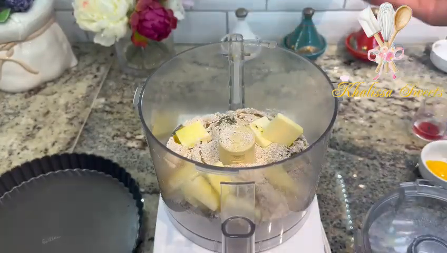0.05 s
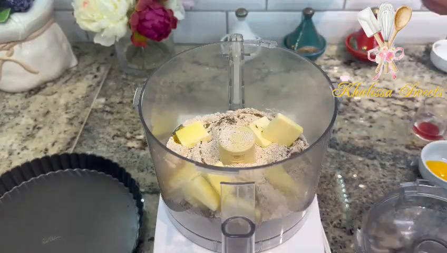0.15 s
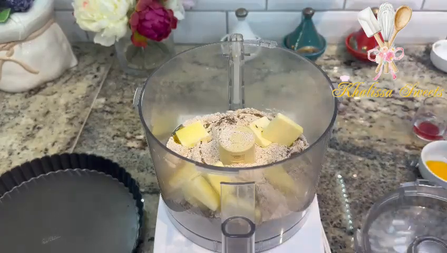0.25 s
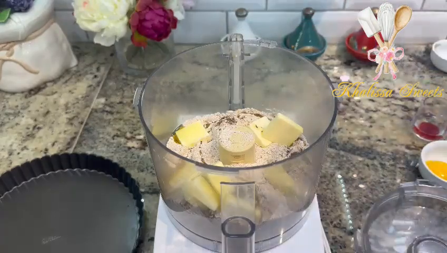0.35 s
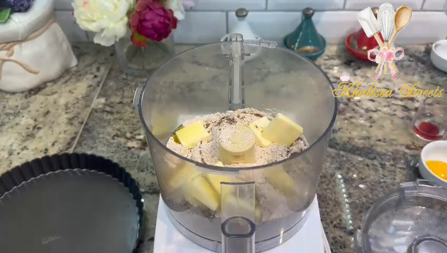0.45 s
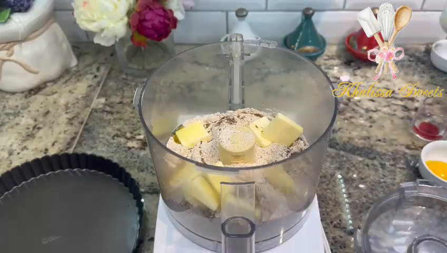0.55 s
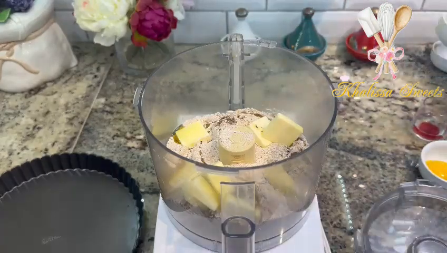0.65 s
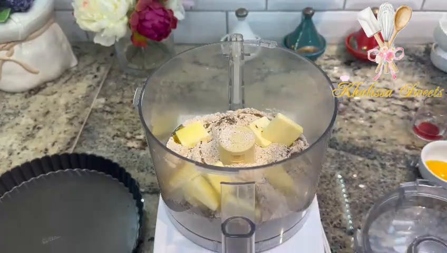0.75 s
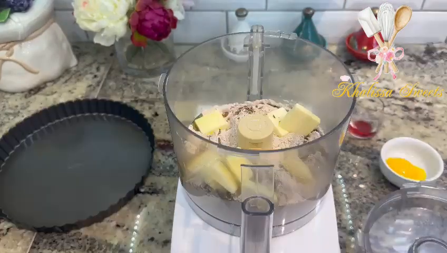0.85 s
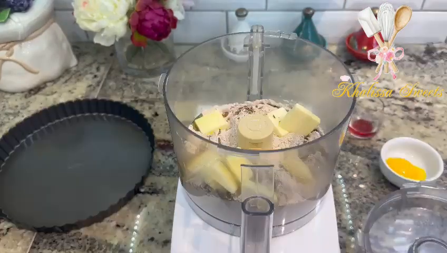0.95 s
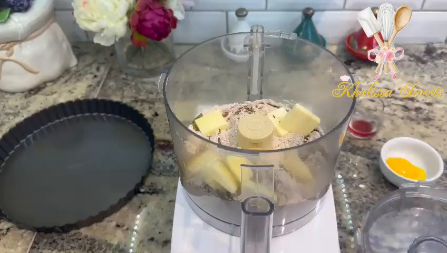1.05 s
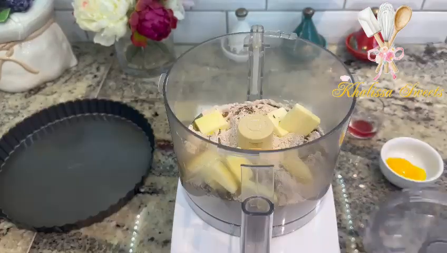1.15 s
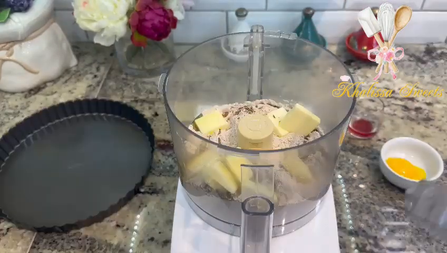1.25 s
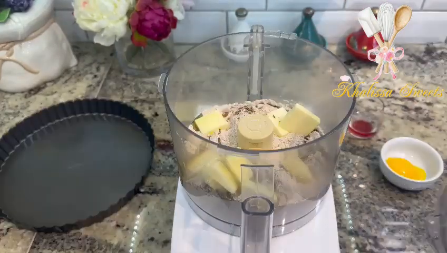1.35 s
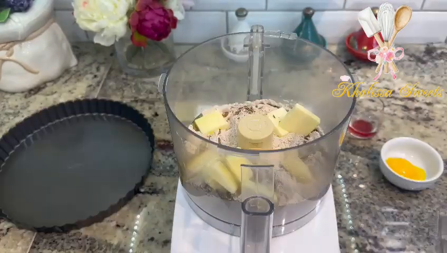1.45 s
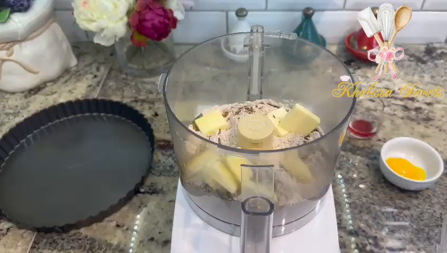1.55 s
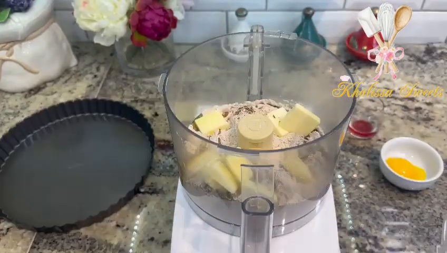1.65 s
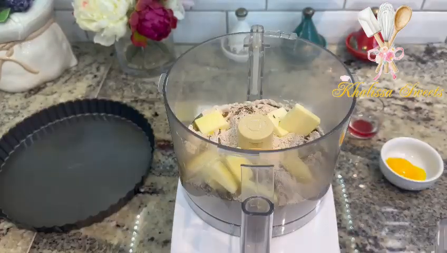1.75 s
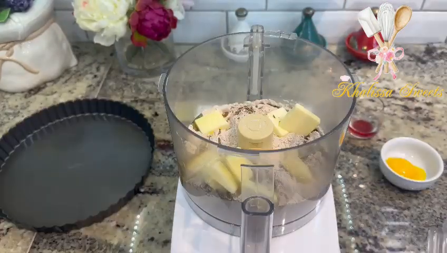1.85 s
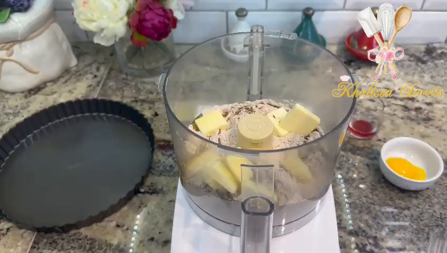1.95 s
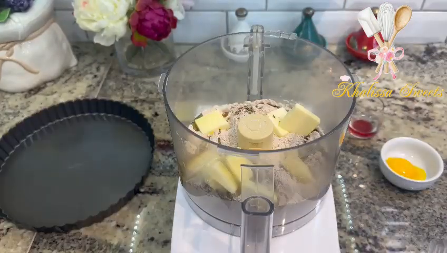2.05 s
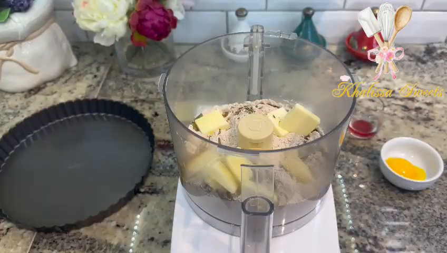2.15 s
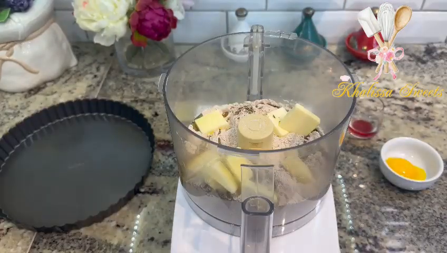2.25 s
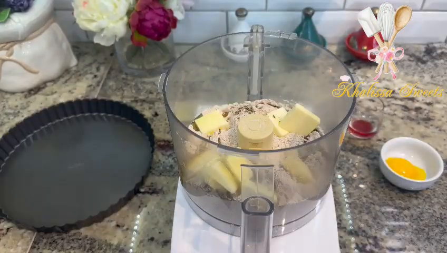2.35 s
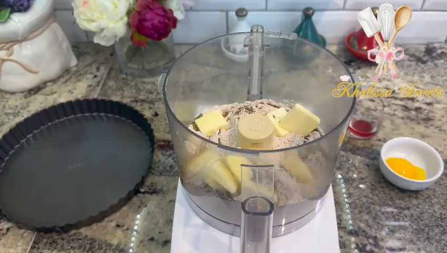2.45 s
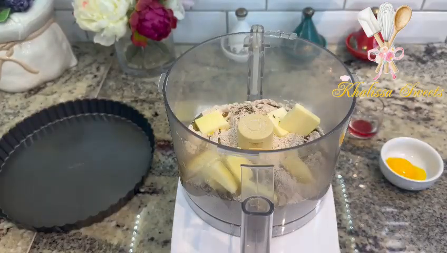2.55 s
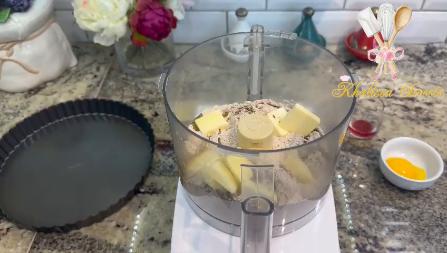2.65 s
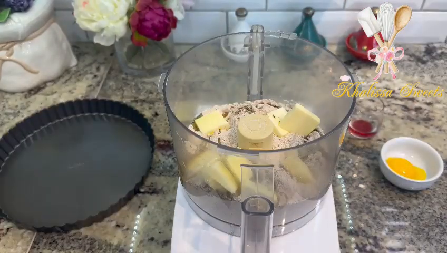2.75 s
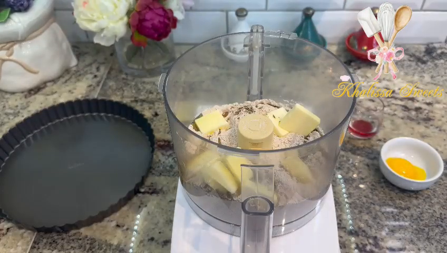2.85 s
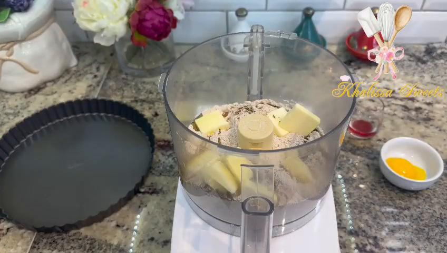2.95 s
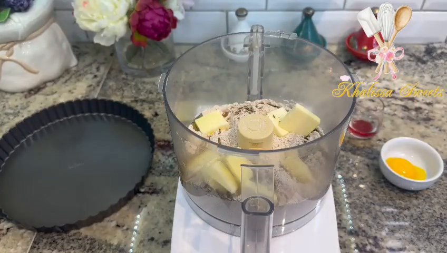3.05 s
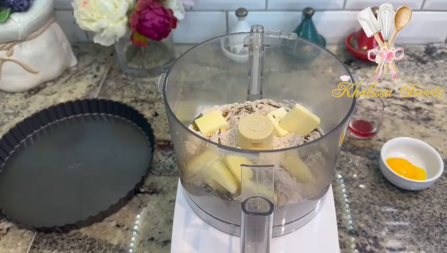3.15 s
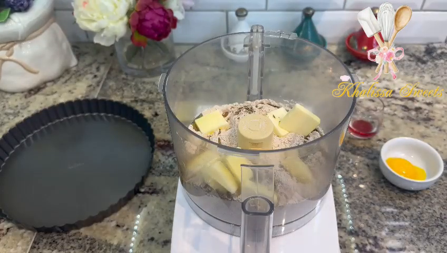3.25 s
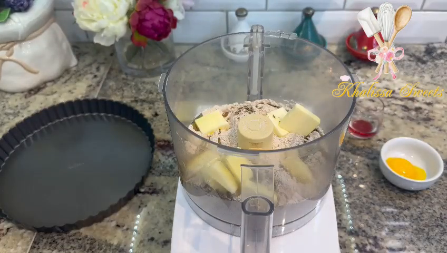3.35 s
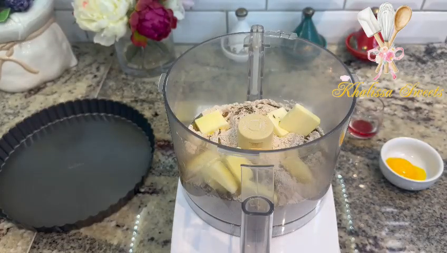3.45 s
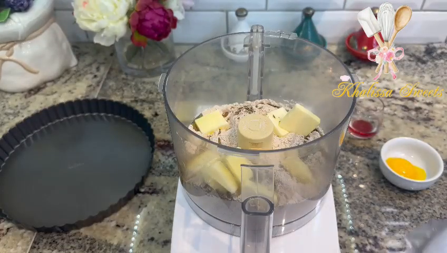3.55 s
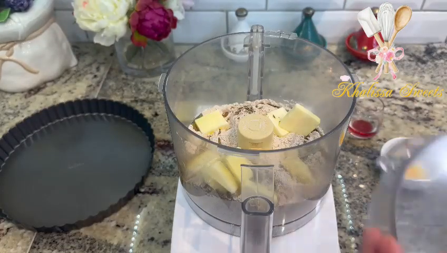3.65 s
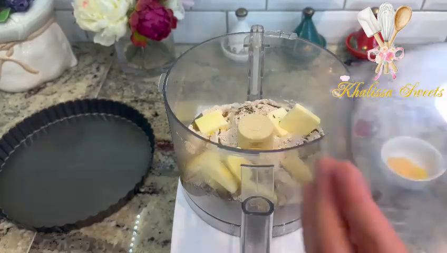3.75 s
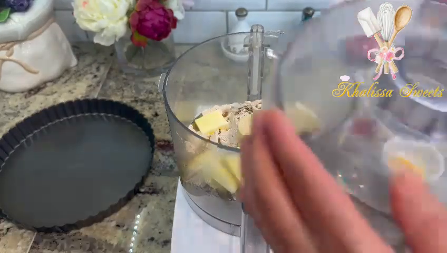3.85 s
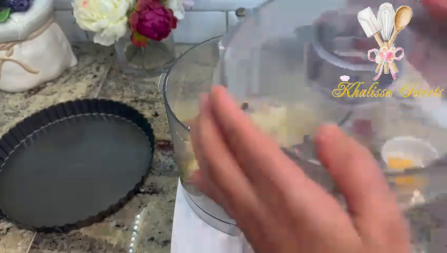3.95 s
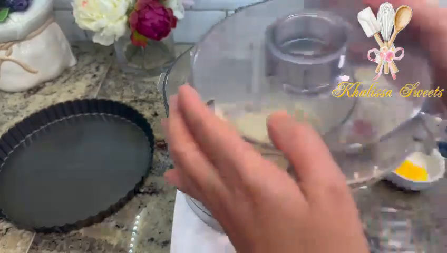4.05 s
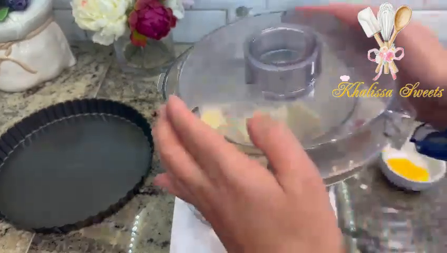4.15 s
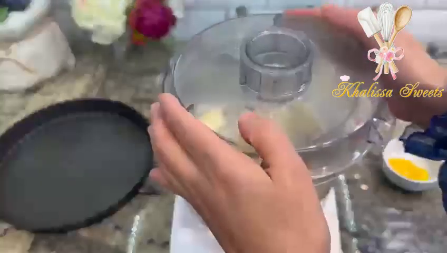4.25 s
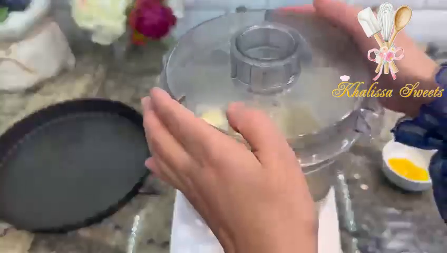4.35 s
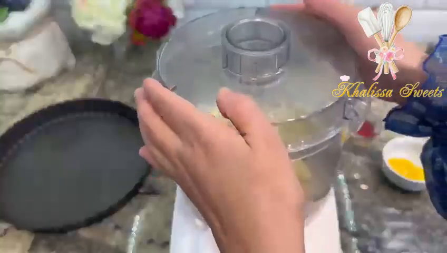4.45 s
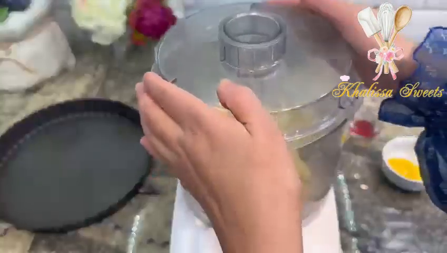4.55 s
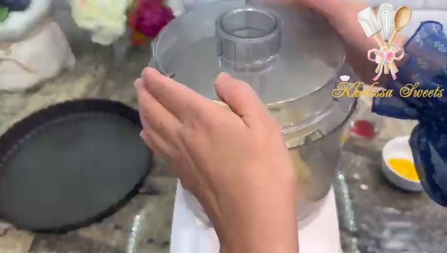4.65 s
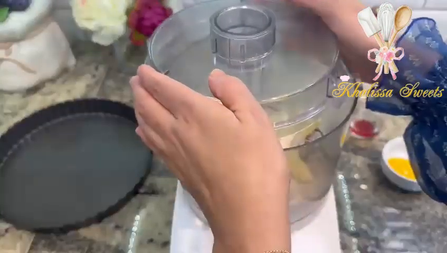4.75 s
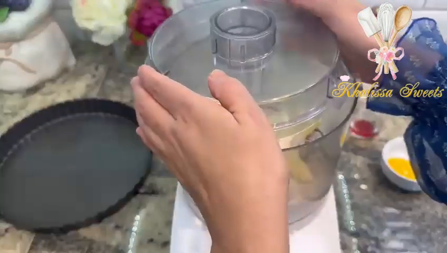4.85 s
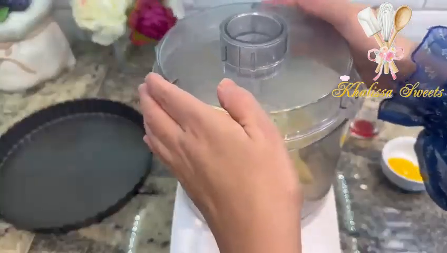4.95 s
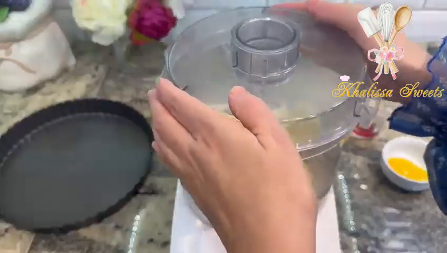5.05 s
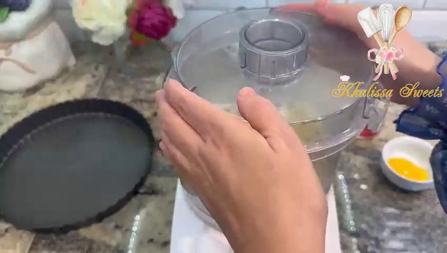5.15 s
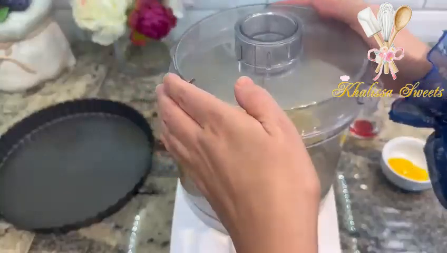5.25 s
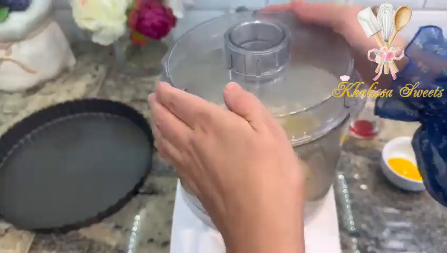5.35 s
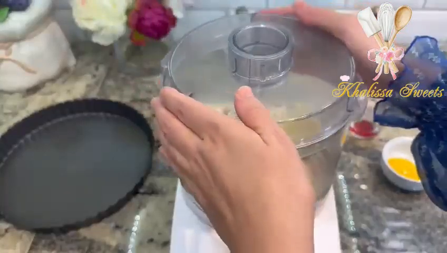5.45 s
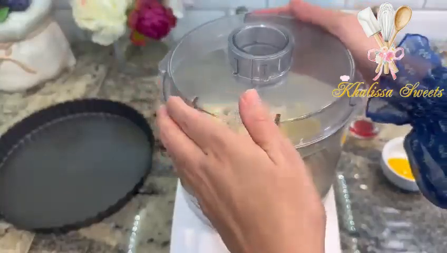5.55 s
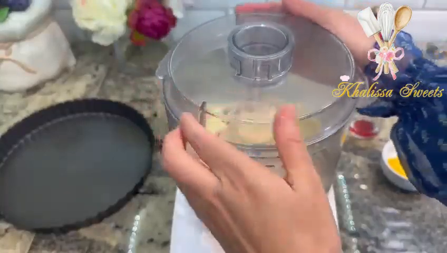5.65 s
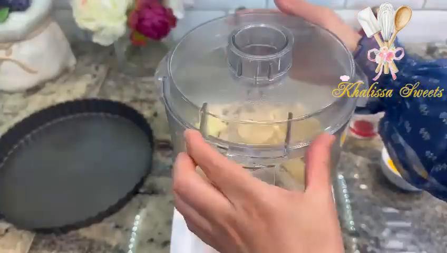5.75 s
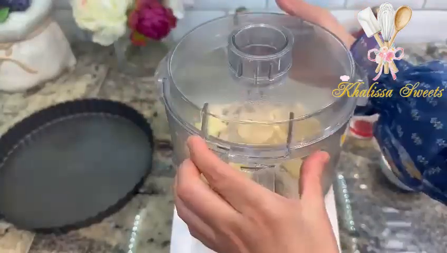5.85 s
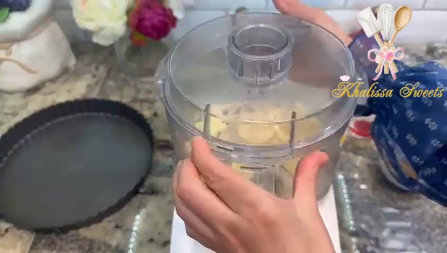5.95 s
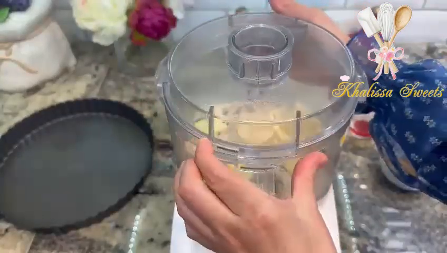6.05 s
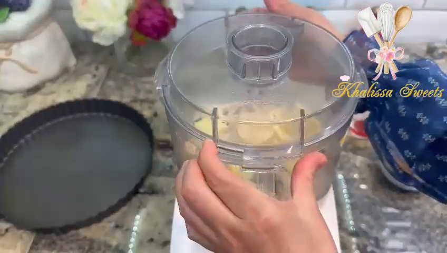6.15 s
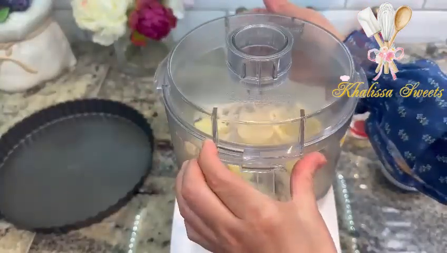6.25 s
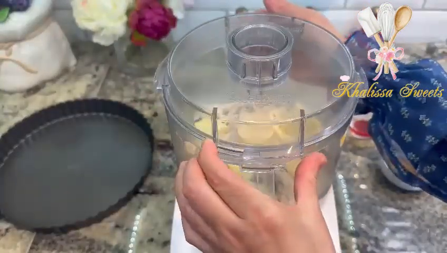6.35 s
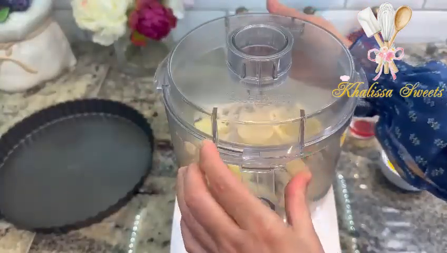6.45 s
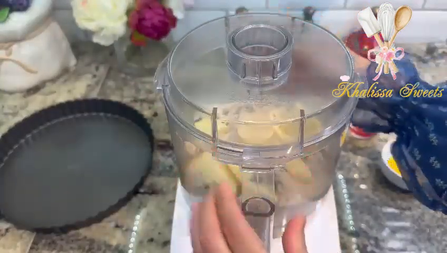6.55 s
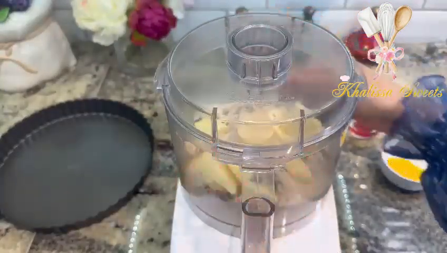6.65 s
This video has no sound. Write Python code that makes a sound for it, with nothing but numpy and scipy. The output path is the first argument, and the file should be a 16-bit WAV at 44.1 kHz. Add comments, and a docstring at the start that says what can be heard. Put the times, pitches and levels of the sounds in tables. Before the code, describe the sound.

In a small kitchen with a low hum, a plastic lid is picked up with a short ringing clatter, followed by soft cloth swishes and scattered taps. Close in front, it clacks onto a food processor bowl and slides along the rim, rasping and knocking hollowly. A quick cluster of clacks with a tiny squeak seats it, and a firm snap locks it. Each knock has a short room echo.

```python
"""Fitting a food processor lid.

A plastic lid is lifted off a counter, set on the bowl, slid round the rim and snapped shut.
Each knock rings the plastic and the air under the lid, whose hollow note falls as the gap closes.
A sleeve rustles in between; the small hard kitchen hums faintly and throws the knocks back."""
import sys
import numpy as np
from scipy import signal
from scipy.fft import rfft, irfft
from scipy.io import wavfile
from scipy.ndimage import uniform_filter1d

SR = 44100
rng = np.random.default_rng(int(sys.argv[2]) if len(sys.argv) > 2 else 0)


def store_wav(level_fs):
    """Save 16-bit WAV to argv[1]."""
    pcm = np.round(np.clip(np.atleast_2d(level_fs), -1, 1) * 32767)
    wavfile.write(sys.argv[1], SR, pcm.T.astype(np.int16))


N = 295955

# sleeve cloth spectrum: freq_hz, density_db
CLOTH_SPECTRUM = [(290, -14.5), (500, -4), (712, -6.5), (902, -5.5), (1300, -2), (1980, -3.5), (2290, -0.5),
                  (2930, -9.5), (4120, -4.5), (6700, -15), (9050, -8.5), (9920, -17), (11500, -44)]
# ring of lid and bowl, with the air under the lid at 524 Hz: freq_hz, level_db, t60_s
SHELL_MODES = [(524, -3, .1), (830, -8, .07), (1029, -5, .17), (1170, -6, .1), (1290, -4, .09),
               (1375, -1, .14), (1490, -2, .11), (1560, -4, .1), (1680, 0, .14), (1810, -8, .07),
               (2036, -8, .1), (2170, -10, .08), (2600, -16, .08), (2713, -17, .11)]
# air under the lid, lower as the gap narrows, higher once seated: time_s, pitch_hz
AIR_PITCH = [(4.24, 562), (4.32, 459), (4.45, 433), (4.52, 407), (4.59, 328), (4.78, 399), (4.97, 369),
             (5.01, 335), (5.2, 404), (5.335, 335), (5.47, 324), (5.7, 299), (6.15, 427)]


def amp(db):
    """Decibels to gain."""
    return 10 ** (np.asarray(db) / 20)


def unit(x):
    """Scale to rms 1."""
    return x / np.sqrt(np.mean(x ** 2) + 1e-20)


def struck(x):
    """Scale a blow to the energy of 20 ms at rms 1."""
    return unit(x) * np.sqrt(0.02 * SR / x.shape[-1])


def read(points, hz):
    """Interpolate on a log-frequency axis."""
    freq_hz, value = np.transpose(points)
    return np.interp(np.log(hz + 1), np.log(freq_hz + 1), value)


def add(mix, start_s, sound):
    """Mix in a stereo sound."""
    part = mix[:, round(start_s * SR):][:, :sound.shape[1]]
    part += sound[:, :part.shape[1]]


def colour(x, gain_db, size=2048):
    """Causal filter with response gain_db(hz)."""
    log_gain = np.log(amp(gain_db(abs(np.fft.fftfreq(size, 1 / SR)))))
    taps = np.fft.ifft(np.exp(np.conj(signal.hilbert(log_gain)))).real
    return signal.fftconvolve(x, taps[None, :size // 2], axes=1)[:, :x.shape[1]]


def bell(hz, centre_hz, width_oct):
    """Bell curve of height 1 over log frequency."""
    return np.exp(-(np.log2((hz + 1) / centre_hz) / width_oct) ** 2)


def paired(x):
    """Make two unrelated channels alike in the bass, as at two close points."""
    # left-right likeness: freq_hz, correlation
    likeness = [(60, 0.82), (200, 0.56), (400, 0.24), (700, 0), (1200, 0.09), (5000, 0.07)]
    left, other = rfft(x)
    same = read(likeness, np.fft.rfftfreq(x.shape[1], 1 / SR))
    return irfft([left, same * left + np.sqrt(1 - same ** 2) * other], x.shape[1])


def noise(spectrum):
    """Coloured stereo noise, rms 1."""
    white = paired(rng.standard_normal((2, N)))
    return unit(colour(white, lambda f: read(spectrum, f), size=8192))


def waver(rate_hz):
    """Random curve, rms 1."""
    knots = rng.standard_normal(4096)
    return unit(np.interp(np.arange(N) / SR * rate_hz, np.arange(len(knots)), knots))


def patchy(x, depth_db, span_hz, span_s):
    """The contact wanders, so parts of the spectrum come and go."""
    bands = signal.stft(x, SR, nperseg=512)[2]
    field = rng.standard_normal(bands.shape[1:])
    for axis, width in enumerate([span_hz * 512 / SR, span_s * SR / 256]):
        for _ in range(2):
            field = uniform_filter1d(field, max(1, round(width)), axis)
    return unit(signal.istft(bands * amp(depth_db * unit(field)), SR, nperseg=512)[1][:, :N])


def stroke(start_s, length_s, level_db, rise_s, release_db_per_s, sag_db_per_s=0):
    """Gain of one movement: attack, hold with optional sag, release."""
    t = np.maximum(np.arange(N) / SR - start_s, 0)
    fall_db = sag_db_per_s * t + release_db_per_s * np.maximum(t - length_s, 0)
    return np.minimum(t / rise_s, 1) * amp(level_db - fall_db)


def ring(modes, t, spread_db, detune=0.0043):
    """Dying modes, bent by the grip; each contact and channel gets its own mix."""
    hz, db, t60_s = np.transpose(modes)[:, :, None]
    hz = hz * (1 + detune * rng.standard_normal(hz.shape))
    weight_db = spread_db * rng.standard_normal((2, len(hz), 1))
    phase = 2 * np.pi * rng.random((2, len(hz), 1))
    return (amp(db + weight_db - 60 * t / t60_s) * np.sin(2 * np.pi * hz * t + phase)).sum(1)


def damped_sines(modes, t):
    """Mono modes starting in phase."""
    return sum(amp(db - 60 * t / t60_s) * np.sin(2 * np.pi * hz * t) for hz, db, t60_s in modes)


def resonate(x, pitch_hz, width_hz):
    """Two resonators in series, following a pitch curve."""
    turn = np.exp(2j * np.pi * np.cumsum(pitch_hz) / SR)
    pole = np.exp(-np.pi * width_hz / SR)
    for _ in range(2):
        x = 2 * (turn * signal.lfilter([1 - pole], [1, -pole], x / turn + 1e-18)).real
    return x


def crack(t, t60_s, gain_db, grit_db=0):
    """Dense, heavily damped plastic modes, gritty where edges chatter."""
    grit = amp(grit_db * waver(rate_hz=800)[:len(t)])
    white = paired(rng.standard_normal((2, len(t))))
    return struck(colour(white * grit * amp(-60 * t / t60_s), gain_db))


def puff(t, hz, swell_cycles):
    """A few cycles that swell and die."""
    age = t * hz / swell_cycles
    return struck(age ** 2 * np.exp(-2 * age) * np.sin(2 * np.pi * hz * t))


def room_tone(air_db=-62.5):
    """Low air noise and a wavering drone."""
    # room air: freq_hz, density_db
    air_spectrum = [(12, -50.5), (20, 0.5), (53, -3.5), (119, -15), (147, -23), (182, -12), (334, -18.5),
                    (436, -17.5), (498, -27.5), (616, -27), (850, -35.5), (1250, -30.5), (1450, -27.5),
                    (1900, -39.5), (3000, -42), (4640, -41.5), (7000, -49.5), (9500, -47), (11500, -59)]
    # kitchen drone: pitch_hz, level_db
    hum_partials = [(62, -74.5), (189, -84)]
    hum, t = 0, np.arange(N) / SR
    for hz, db in hum_partials:
        gain = amp(db + 7.7 * waver(rate_hz=8.6))
        hum += gain * unit(np.sin(2 * np.pi * hz * t + 0.2 * waver(rate_hz=43)))
    swell = amp(air_db + 0.8 * waver(rate_hz=4))
    return swell * noise(air_spectrum) + hum


def fibres(snags_per_s=420, size_db=-2):
    """Single threads snag and let go."""
    snags = (rng.random(N) < snags_per_s / SR) * amp(size_db * np.minimum(rng.exponential(1, N), 3))
    clicks = snags * rng.standard_normal((2, N))
    return unit(colour(clicks, lambda f: read(CLOTH_SPECTRUM, f) + 2 * np.log2((f + 1) / 4000)))


def sleeve(arm_in_s=1.0, stir_db=-78.5, fold_db=3.5, grain_db=-0.56):
    """Rubbing cloth: a faint, uneven hiss, with swishes coloured by their folds."""
    # arm movements: start_s, length_s, level_db, fold_hz
    brushes = [(1.02, .12, -67, 7950), (1.29, 0.1, -67.5, 2780), (1.55, 0.043, -66, 8250),
               (1.608, 0.12, -70, 4600), (1.748, 0.073, -71, 4400), (1.934, 0.26, -69, 1920),
               (2.076, 0.19, -67, 5400), (2.232, 0.13, -66, 3820), (2.358, 0.1, -60.5, 3800),
               (2.543, 0.083, -59.5, 7660), (2.631, .11, -59.5, 4300), (3.498, 0.097, -65, 2200),
               (3.565, 0.098, -62, 3800), (5.573, 0.27, -71, 8660), (6.463, 0.12, -69, 5300)]
    shape = dict(rise_s=0.032, release_db_per_s=263)
    cloth = patchy(noise(CLOTH_SPECTRUM) + amp(-4) * fibres(), depth_db=3.2, span_hz=300, span_s=0.05)
    out = cloth * stroke(arm_in_s, N / SR, stir_db, **shape) * amp(2.5 * waver(rate_hz=14))
    for start_s, length_s, level_db, fold_hz in brushes:
        swish = unit(colour(cloth, lambda f: fold_db * bell(f, fold_hz, width_oct=0.24), size=512))
        out += stroke(start_s, length_s, level_db, **shape) * np.roll(swish, rng.integers(N), axis=1)
    return amp(grain_db * waver(rate_hz=280)) * out


def bumps(lifted_s=1.5, muted_db=-14, fall_s=0.005):
    """The loose lid is bumped and scuffed; it rings freely until the hand mutes it."""
    # contacts: start_s, level_db, centre_hz, half_width_oct, thump_db, rise_s
    contacts = [(1.0448, -44.5, 1620, 0.56, -92, 0.0002), (1.073, -53, 1370, 1.3, -70, .015),
                (1.1001, -38, 1220, 1.03, -59.5, 0.00029), (1.107, -36, 1030, 0.9, -61, 0.00037),
                (1.128, -54, 1140, 1.15, -62, 0.00066), (1.263, -55, 5350, 0.22, -77, 0.037),
                (1.275, -53.5, 1050, 0.65, -69, 0.015), (2.561, -67, 2780, 1.3, -76, 0.0008),
                (2.584, -47, 865, 1.53, -65, 0.01), (2.724, -48, 1090, 1.2, -67.5, 0.0017),
                (3.589, -41.5, 756, 0.84, -80, 0.0033)]
    # loose lid: freq_hz, level_db, t60_s
    lid_modes = [(856, 2, .23), (1030, -1, .2), (1157, 4, .28), (1195, 3.5, .24), (1290, 3, .1),
                 (1475, -2, .24), (1556, -3, .2), (2256, -6, .15)]
    out, t = np.zeros((2, N)), np.arange(SR // 3) / SR
    for start_s, level_db, centre_hz, half_width_oct, thump_db, rise_s in contacts:
        band_db = lambda f: np.maximum(-10 * (np.log2((f + 1) / centre_hz) / half_width_oct) ** 4, -42)
        onset = 1 - np.exp(-t / rise_s)
        white = paired(rng.standard_normal((2, len(t))))
        clack = struck(colour(white * onset * np.exp(-t / (fall_s + rise_s)), band_db))
        ringing = colour(struck(ring(lid_modes, t, spread_db=1.5) * onset), band_db)
        plastic = clack + amp(muted_db * (start_s > lifted_s)) * ringing
        thump = puff(t, hz=102, swell_cycles=2.2) + amp(-1.5) * puff(t, hz=387, swell_cycles=0.55)
        add(out, start_s, amp(level_db - 10.5) * plastic + amp(thump_db) * thump)
    return out


def kitchen(x, first_s=0.0081, build_s=0.00069, echoes_per_s=4000):
    """Reflections off counter, tiles and cupboards; each band dies at its own rate."""
    # reverberation: freq_hz, t60_s
    decay_times = [(150, 0.39), (400, 0.35), (1000, 0.43), (2800, 0.4), (7500, 0.31)]
    echoes = rng.standard_normal((2, SR // 2)) * (rng.random((2, SR // 2)) < echoes_per_s / SR)
    hz, t, bands = signal.stft(paired(echoes), SR, nperseg=256)
    bands *= amp(-3 / (1 + (hz[:, None] / 330) ** 4))  # cupboard doors soak up bass
    bands *= amp(-60 * t / read(decay_times, hz)[:, None])
    tail = signal.istft(bands, SR, nperseg=256)[1]
    tail *= np.clip((np.arange(tail.shape[1]) / SR - first_s) / build_s, 0, 1)
    return signal.fftconvolve(x, tail / np.linalg.norm(tail[0]), axes=1)[:, :N]


def knocks(hard_clack_hz=1820, tick_db_per_oct=48, light_db=-43, light_rise_s=0.0013):
    """Lid on bowl: contact tick, ringing clack, puff of trapped air, thud of the base."""
    # blows, levels relative: start_s, clack_db, tick_db, air_db, thud_db
    blows = [(4.23, -14, -34, -22, -47), (4.24, -22.5, -50, -20.5, -34), (4.316, -23, -47, -17.5, -46.5),
             (4.341, -46, -62, -32, -49.5), (4.512, -55.5, -52, -33, -43), (4.577, -42, -66, -36, -66),
             (4.687, -57, -58, -38.5, -46.5), (4.729, -41.5, -70, -37, -49), (4.769, -63, -72, -41, -50.5),
             (4.938, -39, -74, -44.5, -55), (4.961, -33, -65, -30, -47), (5.052, -38, -58, -40.5, -40.5),
             (5.167, -47, -65, -35, -54), (5.247, -38.5, -66, -46, -54), (5.34, -29, -43, -26, -49),
             (5.366, -22.5, -36.5, -23, -33), (5.382, -23.5, -34, -24.5, -28.5),
             (5.386, -25.5, -38.5, -48, -50), (5.392, -21, -50, -43, -37), (5.4155, -19.5, -48, -28, -39),
             (5.423, -21, -53, -42, -25.5), (5.465, -14, -36, -26.5, -65), (5.47, -23, -36, -53, -30.5),
             (5.66, -30, -46, -67, -67), (5.68, -26.5, -70, -50, -36.5), (5.745, -42.5, -54, -47, -35.5),
             (5.946, -50.5, -53, -75, -55.5), (6.051, -40.5, -33, -70, -44), (6.138, -27, -29, -63, -35),
             (6.1434, -15.5, -26, -38, -22.5), (6.146, -15, -27.5, -57.5, -65),
             (6.148, -21.5, -52, -26.5, -20.5), (6.182, -52, -61, -50, -39), (6.354, -63, -70, -61, -49),
             (6.4, -40.5, -55.5, -46.5, -70), (6.447, -46, -65, -60, -41), (6.536, -39, -53, -70, -48.5)]
    # bowl rocking on the motor base: freq_hz, level_db, t60_s
    base_modes = [(62.6, -19, 0.58), (107.5, -1.5, 0.14), (166.5, 7, 0.15), (337, 5.5, 0.062),
                  (511, -12, 0.2)]
    # rim and locking tabs: freq_hz, level_db, t60_s
    tab_modes = [(3400, 0, .06), (3680, -4, .06), (3950, -2, .06), (4250, -5, .05), (5600, -6, .05),
                 (6520, -6, .07), (8800, -8, .05)]
    # plastic body: freq_hz, density_db
    clack_spectrum = [(60, -71), (200, -4.5), (450, 5), (620, 4.5), (760, -1.5), (1000, 0), (1350, -2),
                      (1700, -4), (2300, -5), (2900, -42), (5000, -42), (10000, -42)]
    # hard edges: freq_hz, density_db
    tick_spectrum = [(1000, -17), (2400, 2.5), (3000, 0), (3600, 1), (4700, -4), (6400, -6.5),
                     (7100, -17.5), (8200, -9.5), (9800, -13), (11000, -18)]
    # shell ring against its crack, damped by the hands: time_s, ring_db
    freedom = [(4.25, -1.5), (4.6, -6), (5.4, -4), (5.47, -12.5), (6.1, -9)]
    out, t = np.zeros((2, N)), np.arange(SR // 3) / SR
    rocking = struck(damped_sines(base_modes, t))
    thud = amp(-8) * puff(t, hz=205.7, swell_cycles=1.57) + amp(-5.5) * rocking
    for start_s, clack_db, tick_db, air_db, thud_db in blows:
        # more tick, higher clack
        centre_hz = hard_clack_hz * 2 ** ((tick_db - clack_db) / tick_db_per_oct)
        focused_db = lambda f: read(clack_spectrum, f) + 3 * bell(f, centre_hz, width_oct=0.46)
        ring_db = np.interp(start_s, *np.transpose(freedom))
        shell = amp(ring_db) * struck(ring(SHELL_MODES, t, spread_db=2.5))
        tabs = amp(-12) * struck(ring(tab_modes, t, spread_db=2))
        clack = crack(t, t60_s=0.033, gain_db=focused_db, grit_db=2) + shell
        tick = crack(t, t60_s=0.043, gain_db=lambda f: read(tick_spectrum, f), grit_db=4) + tabs
        plastic = amp(clack_db - 13) * clack + amp(tick_db - 8.5) * tick
        air_hz = np.interp(start_s, *np.transpose(AIR_PITCH))
        air = puff(t, air_hz, swell_cycles=2.03) + amp(-16.5) * draught(t)
        rise_s = light_rise_s * 2 ** ((light_db - clack_db) / 8)  # light touches start softly
        onset = 1 - np.exp(-t / rise_s)
        add(out, start_s, onset * plastic + amp(air_db - 7.5) * air + amp(thud_db) * thud)
    return out


def draught(t, t60_s=0.49, band_hz=(48, 95)):
    """Low flutter of air squeezed from under the lid."""
    gust = rng.standard_normal((2, len(t))) * amp(-60 * t / t60_s)
    return struck(signal.sosfilt(signal.butter(2, band_hz, "bandpass", fs=SR, output="sos"), gust))


def slide(slips_per_s=420, size_db=2.5, leak_db_per_s=30.5, spot_s=0.075, spots=4):
    """Rim on rim: tiny stick-slips rasp the plastic; larger jumps sound the trapped air."""
    # pushes along the rim: start_s, length_s, scrape_db, pressure_db
    pushes = [(4.321, 0.16, -49.5, -39), (4.474, 0.23, -50, -45), (4.912, 0.17, -43.5, -40.5),
              (5.09, 0.45, -55, -47.5), (5.253, .06, -47.5, -63), (5.305, 0.041, -36.5, -22.5),
              (5.36, 0.065, -48, -47), (5.64, 0.054, -50.5, -46), (5.93, 0.19, -65.5, -62),
              (6.352, 0.25, -63, -57)]
    # rim friction: freq_hz, density_db
    scrape_spectrum = [(40, -22), (110, -2.5), (200, 5.5), (290, -2.5), (400, 0.5), (580, 10), (730, 0),
                       (850, 5.5), (1100, -4.5), (1500, -6.5), (1900, -7.5), (2300, -4.5), (3000, -11.5),
                       (4000, -14), (7000, -24.5), (9500, -22.5), (11000, -52.5)]
    shape = dict(rise_s=0.088, release_db_per_s=230)
    scraping = pressure = rasp = 0
    for start_s, length_s, scrape_db, pressure_db in pushes:
        scraping += stroke(start_s, length_s, scrape_db, **shape)
        pressure += stroke(start_s, length_s, pressure_db, **shape, sag_db_per_s=leak_db_per_s)
    sizes = amp(size_db * np.minimum(rng.exponential(1, N), 4))
    slips = sizes * (rng.random(N) < slips_per_s / SR) * rng.choice([-1, 1], N)
    judder = amp(0.5 * waver(rate_hz=86))
    t, slip_t = np.arange(N) / SR, np.arange(SR // 10) / SR
    # the contact travels round the rim; each spot has its own response
    spot = (t / spot_s).astype(int) % spots
    for k in range(spots):
        response = crack(slip_t, t60_s=0.068, gain_db=lambda f: read(scrape_spectrum, f))
        response += amp(-7) * struck(ring(SHELL_MODES, slip_t, spread_db=4))
        rasp += signal.oaconvolve((slips * (spot == k))[None], response, axes=1)[:, :N]
    plastic = unit(rasp) + amp(-10) * noise(scrape_spectrum)
    plastic = patchy(plastic, depth_db=2.8, span_hz=220, span_s=0.042)
    # the lid rocks, so the gap and its note wobble
    air_hz = np.interp(t, *np.transpose(AIR_PITCH)) * (1 + 0.048 * waver(rate_hz=170))
    air = unit(resonate(stutter(), air_hz, width_hz=105))
    return judder * (amp(1) * scraping * plastic + amp(-3.5) * pressure * air)


def stutter(jumps_per_s=58, uneven=0.35, spread_db=2):
    """The whole lid catches and jumps: an uneven impulse train."""
    count = np.cumsum(jumps_per_s * np.exp(uneven * waver(rate_hz=60))) / SR
    jumps = np.diff(np.floor(count), prepend=0)
    return jumps * rng.choice([-1, 1], N) * amp(spread_db * rng.standard_normal(N))


def squeak(width_hz=170, jitter=0.013):
    """Very fast stick-slip: a thin, rough whistle."""
    # rim squeaks: start_s, length_s, pitch_hz, level_db
    squeaks = [(5.41, 0.042, 3540, -52.5)]
    out = 0
    for start_s, length_s, pitch_hz, level_db in squeaks:
        rough_hz = pitch_hz * (1 + jitter * waver(rate_hz=99))
        tone = np.array([resonate(x, rough_hz, width_hz) for x in rng.standard_normal((2, N))])
        out += stroke(start_s, length_s, level_db, rise_s=0.0042, release_db_per_s=711) * unit(tone)
    return out


def latch(start_s=6.05, snap_db=-37, grain_db=2):
    """The locking tab snaps onto its ramp and drags up it: a hollow tick, a thin scrape."""
    # tab on ramp: freq_hz, density_db
    tab_spectrum = [(410, -47), (650, -3.5), (900, 2), (1350, -3), (1950, 3), (2400, 1), (2900, -16),
                    (3950, -7), (4650, 3), (5200, -8), (9150, -8.5), (10300, -21), (11000, -57)]
    drag = stroke(start_s, length_s=0.1, level_db=-58, rise_s=0.006, release_db_per_s=600)
    grain = amp(grain_db * waver(rate_hz=100))
    out = drag * grain * patchy(noise(tab_spectrum), depth_db=6, span_hz=260, span_s=0.07)
    snap = crack(np.arange(SR // 10) / SR, t60_s=0.045, gain_db=lambda f: read(tab_spectrum, f))
    add(out, start_s, amp(snap_db) * snap)
    return out


def lock(start_s=6.15):
    """Lid and bowl ring as one when the tab drops home."""
    # locked lid and bowl: freq_hz, level_db, t60_s
    locked_modes = [(225, -22, 0.074), (335, -20.5, .07), (421, -35, 0.32), (1380, -25, 0.069),
                    (2650, -36.5, 0.076)]
    out = np.zeros((2, N))
    tone = damped_sines(locked_modes, np.arange(SR // 3) / SR)
    add(out, start_s, np.array([tone, tone]))
    return out


def scene():
    """Loose lid and arm to the right, bowl nearly in front."""
    blows = knocks()
    rubbing = slide() + squeak() + latch()
    lifting = bumps()
    bowl = blows + lock() + rubbing + kitchen(amp(-8.5) * blows + amp(-6.5) * rubbing)
    loose_lid = lifting + amp(-7) * kitchen(lifting)
    plastic = bowl * amp([[-0.7], [0.7]]) + loose_lid * amp([[-3], [2.5]])
    return plastic + sleeve() * amp([[-1.4], [1.4]]) + room_tone()


def record(dry, low_cut_hz=40, high_cut_hz=10550):
    """Low cut and band limit."""
    x = signal.sosfilt(signal.butter(2, low_cut_hz, "highpass", fs=SR, output="sos"), dry)
    lowpass = signal.firwin(127, high_cut_hz, window=("kaiser", 8), fs=SR)
    return signal.oaconvolve(x, lowpass[None], "same")


dry = scene()
out = record(dry)
store_wav(out)
```